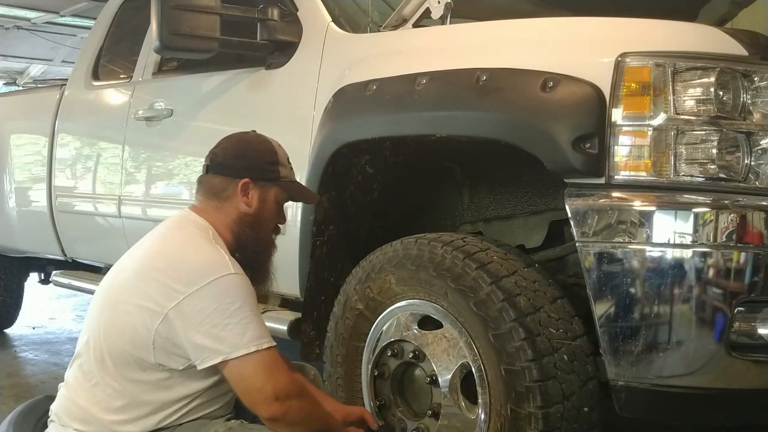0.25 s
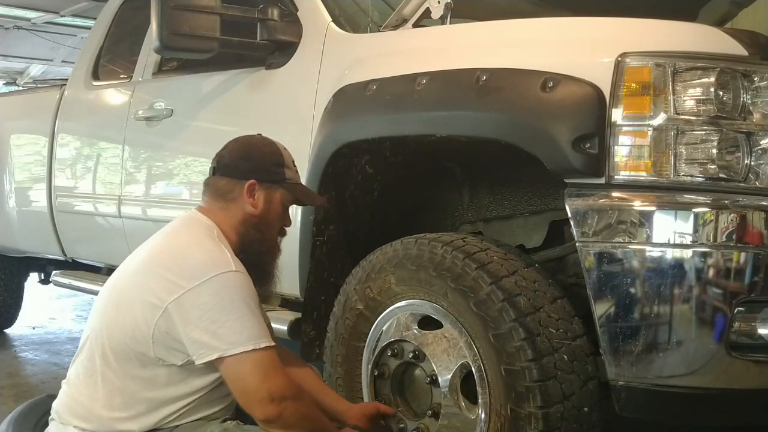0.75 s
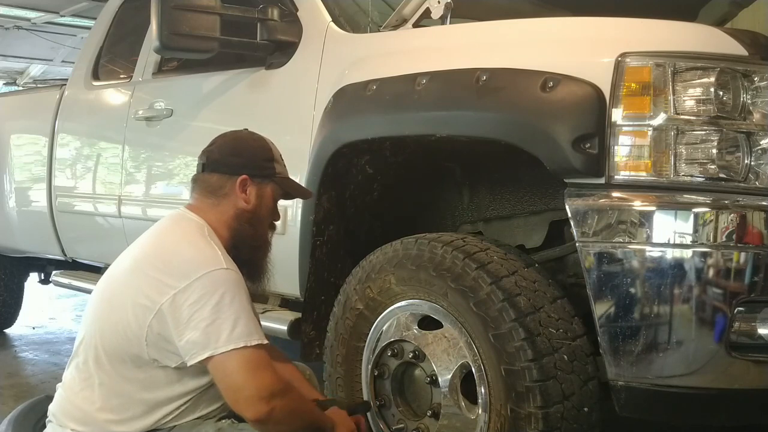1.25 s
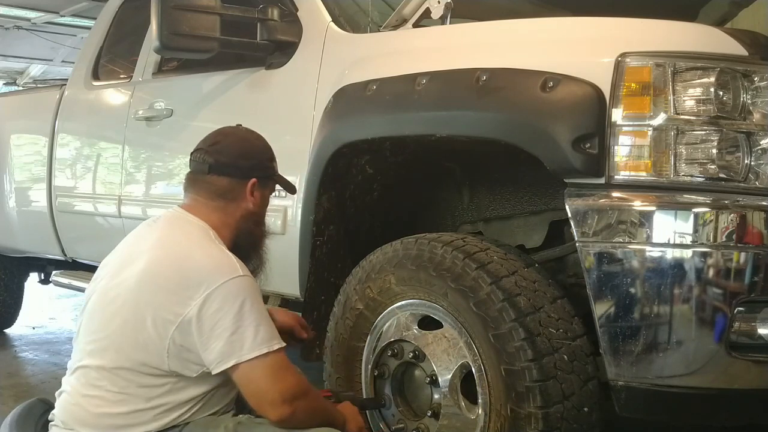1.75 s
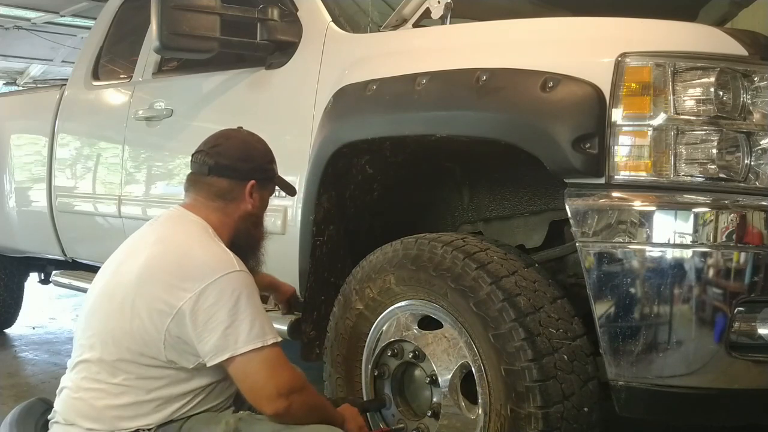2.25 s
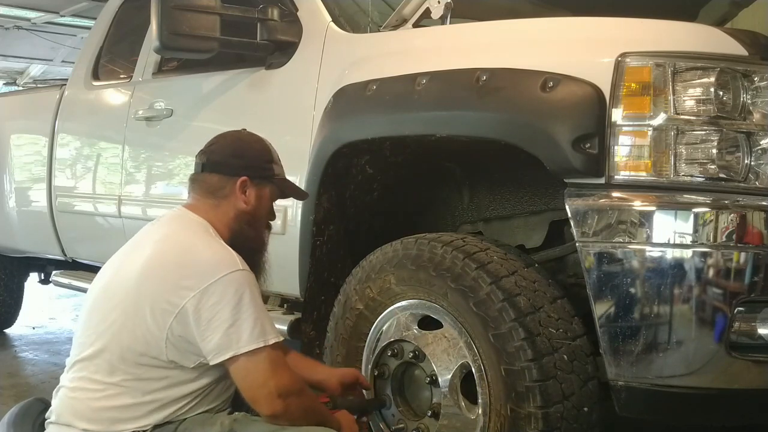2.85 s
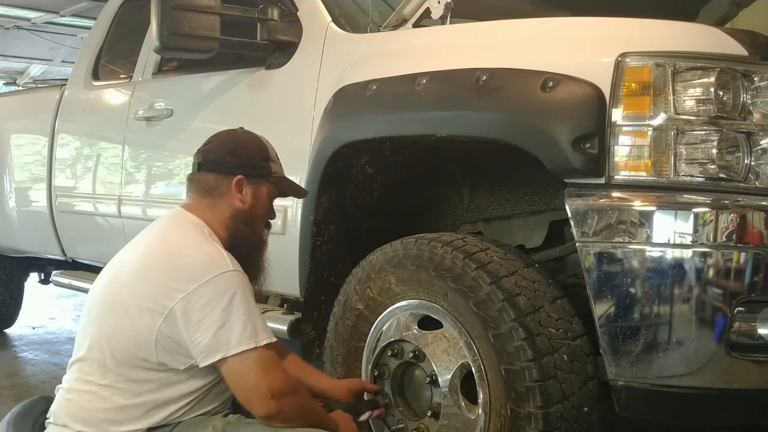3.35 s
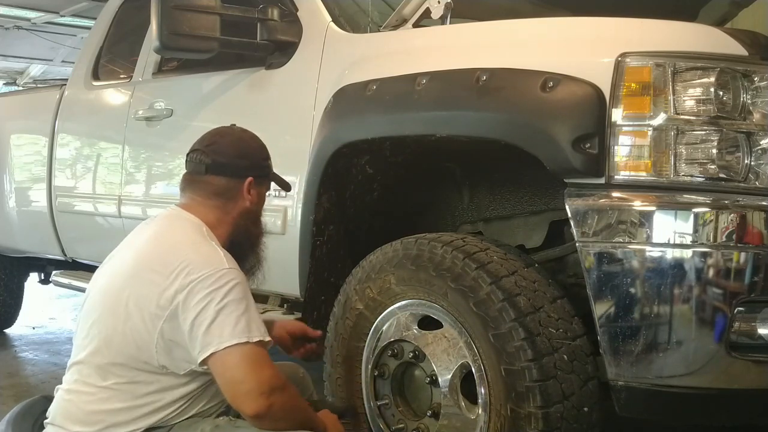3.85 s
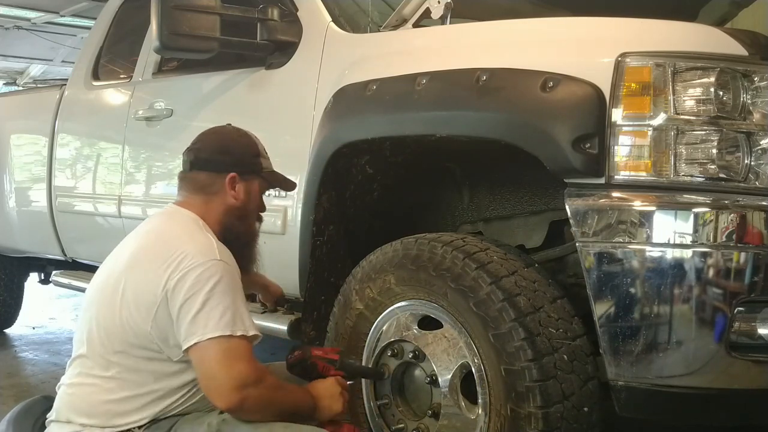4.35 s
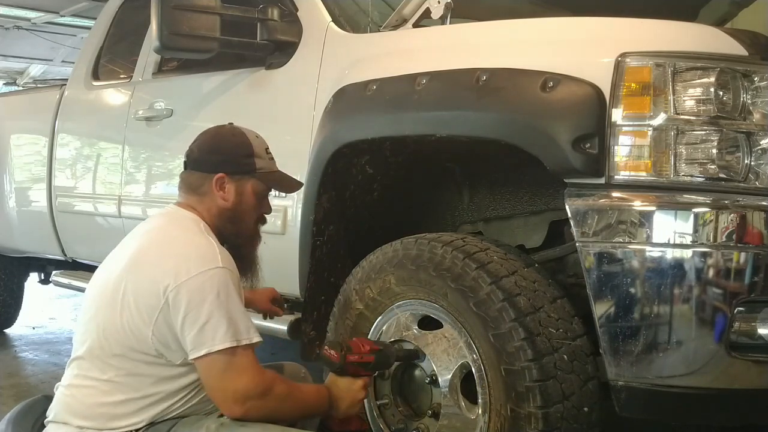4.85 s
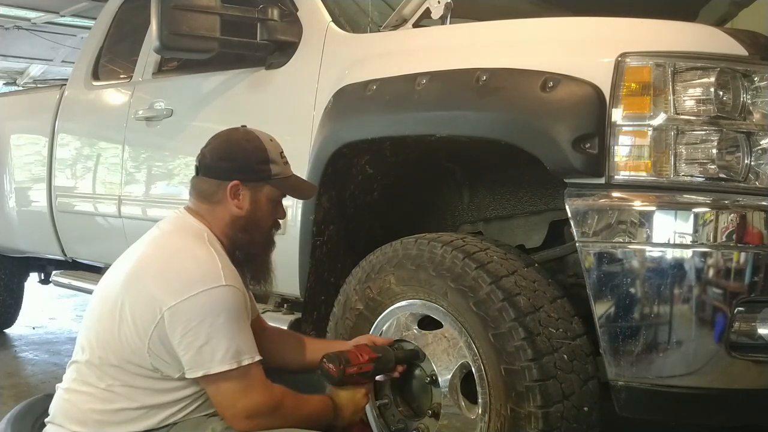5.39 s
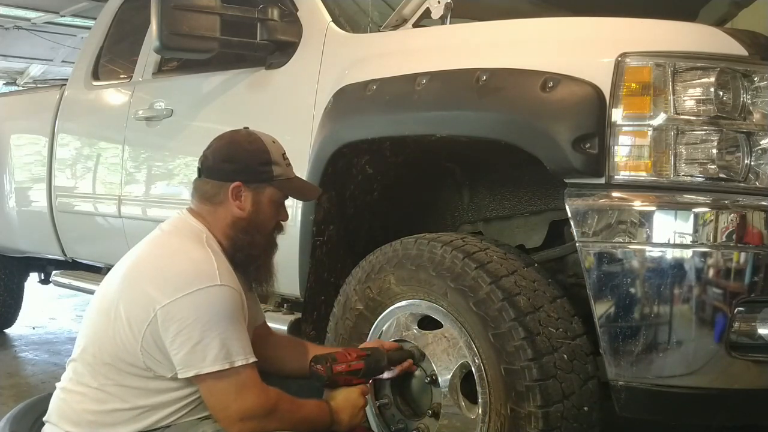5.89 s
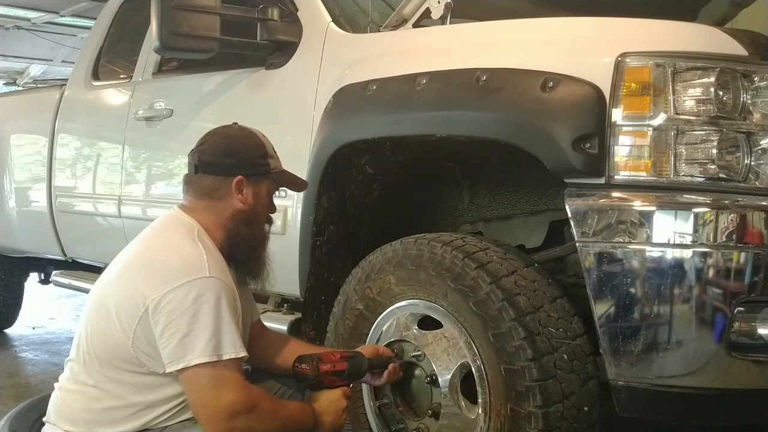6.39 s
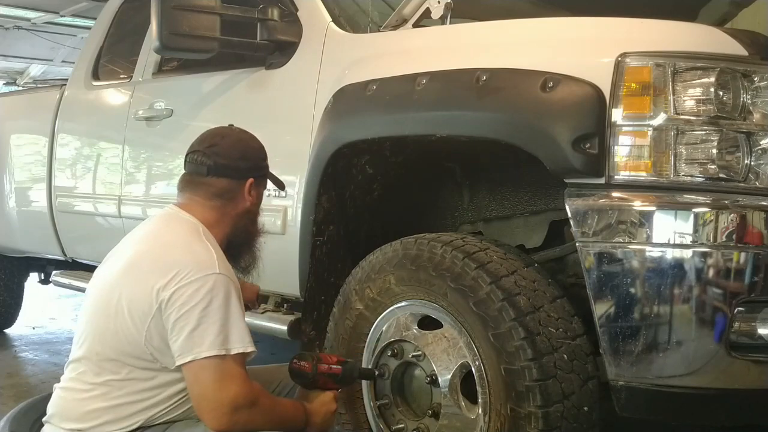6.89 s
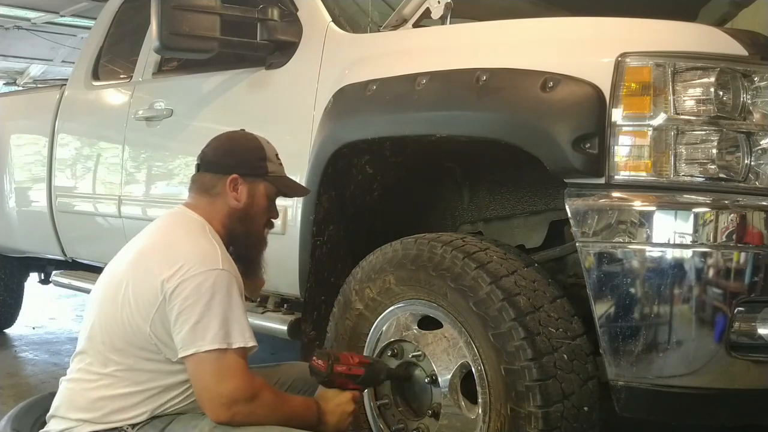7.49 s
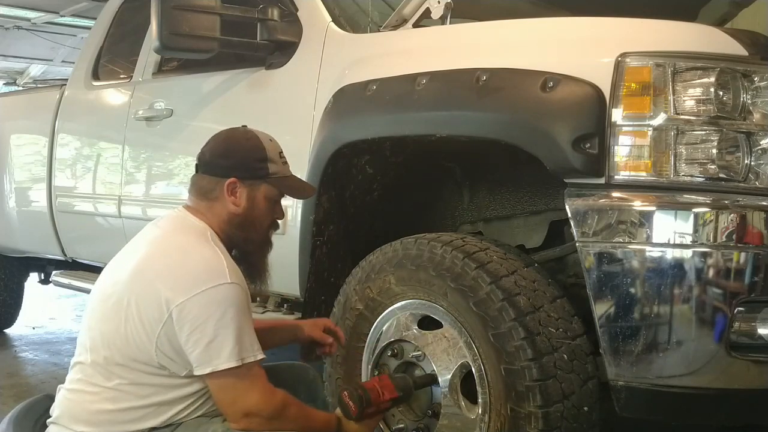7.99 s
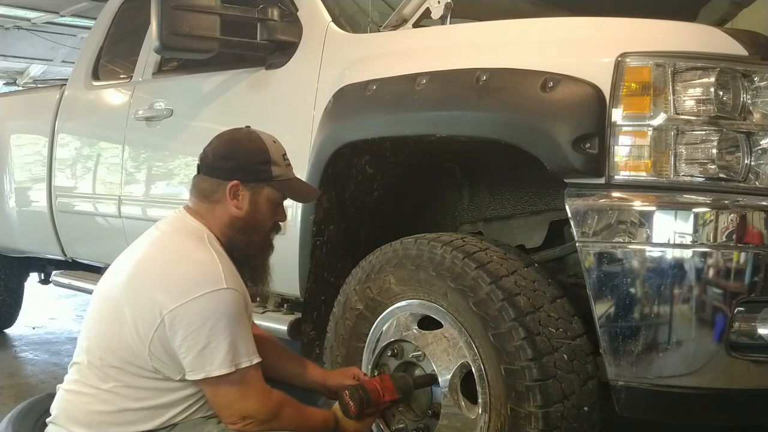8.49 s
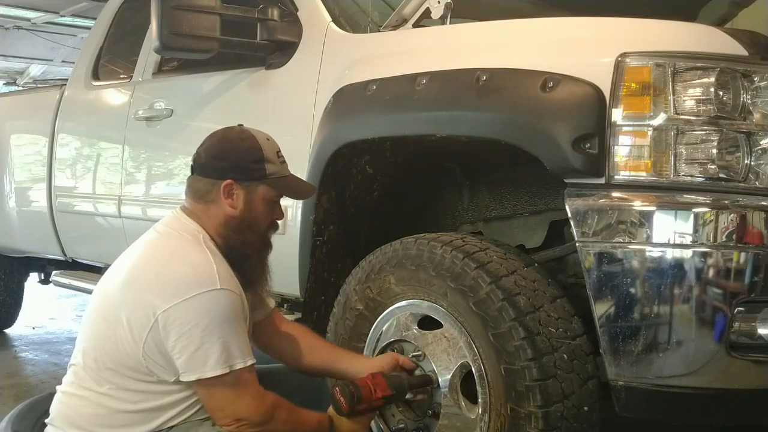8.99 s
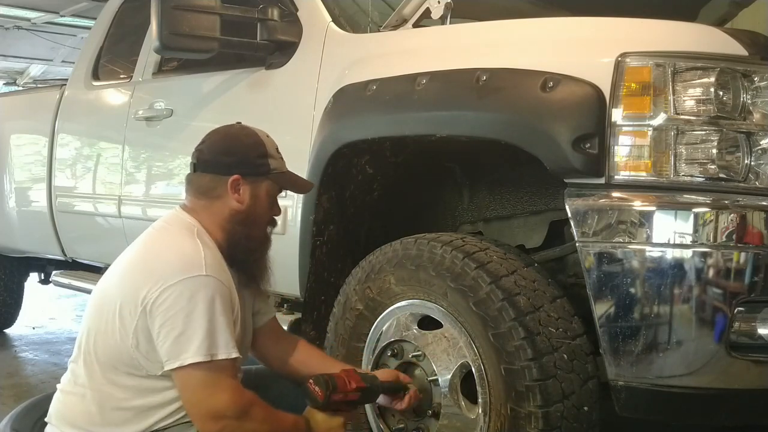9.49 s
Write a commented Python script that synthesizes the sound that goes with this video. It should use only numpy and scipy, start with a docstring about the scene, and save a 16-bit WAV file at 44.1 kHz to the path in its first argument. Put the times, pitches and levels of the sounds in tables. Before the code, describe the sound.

A cordless impact wrench whirs up, hammers briefly and squeals down three times in a hard workshop, with metal nuts clinking and clanging between pulls.

```python
"""Impact wrench on truck lug nuts

A cordless impact wrench takes lug nuts off a truck wheel in a hard-walled workshop.
Motor speed sets whine, growl and squeal; a start chirp, gear clatter and near-periodic hammer blows
of uneven strength join in. Between pulls, chattering contacts excite damped modes of nuts, socket,
wheel and running board. A fan hums below; changing reverberation and a delayed subtraction between
two close ports shape the stereo.
"""
import sys
import numpy as np
from scipy import signal
from scipy.fft import rfft, irfft, next_fast_len
from scipy.io import wavfile
from scipy.ndimage import uniform_filter1d

SR = 44100
rng = np.random.default_rng(int(sys.argv[2]) if len(sys.argv) > 2 else 0)


def master_out(mix):
    """Clip the mix to full scale and print it as 16-bit PCM to the path in sys.argv[1]."""
    frames = np.transpose(np.atleast_2d(mix))
    ceiling = np.clip(frames, -1, 1)
    pcm = np.round(ceiling * 32767).astype(np.int16)
    wavfile.write(sys.argv[1], SR, pcm)


N = 429534
T = np.arange(N) / SR

# Table levels are relative drive or mode levels, ahead of filters, mixing gains and room.
# trigger pulls: pressed t/s, let go t/s, gears catch t/s, at rest t/s, top whine f/Hz before load,
# spin-up time/s, coast time/s, running level/dB, shudder level/dB, whirr level/dB, braking squeal level/dB
PULLS = [(-.3, -.065, 0.041, 0.52, 4200, 0.047, 0.43, -23.5, -29.5, -42.5, -24.5),
         (.24, 0.441, 0.51, 0.61, 3001, .07, .3, -37, -36, -47.5, -62),
         (0.644, .875, 1.123, 1.177, 3853, .066, .6, -40.5, -34.5, -36.5, -57),
         (2.668, 3.544, 3.78, 3.91, 4552, 0.072, .33, -30, -30.5, -42, -22),
         (5.361, 6.201, 6.432, 6.56, 4567, .07, .335, -33, -31, -51.5, -17.5),
         (8.531, 9.474, 9.68, 9.9, 4574, .07, 0.37, -29.5, -27, -49, -19.5)]
# hammering: start t/s, end t/s, level/dB, time for which the freed nut still drags on its thread/s
HAMMERING = [(2.728, 3.009, -29.5, 0.15), (5.405, 5.653, -30, 0.33), (8.588, 8.895, -30, 0.21)]
# socket pushed on to the next nut: first touch t/s, seated t/s, knock level/dB, ring level/dB, hollow note f/Hz
SEATINGS = [(2.347, 2.365, -24.5, -45, 454), (4.576, 4.588, -31.5, -42.5, 604),
            (7.382, 7.402, -39.5, -42.5, 657)]
# thud spectrum of the wheel: f/Hz, spectral level/dB
WHEEL = [(30, -17), (70, -3.5), (140, -1.5), (240, -3.5), (450, -7), (900, -12.5), (2000, -20), (6000, -40)]
# high rings of a loose nut, of the socket and of a nut spinning on its stud
NUT_HZ, SOCKET_HZ, STUD_HZ = 11690, 12280, 12990
FULL_HZ = 4593  # reference whine at full speed
SEAT_CHATTER_S = 0.045
THREAD_FADE_S = 0.16  # time constant with which the gears open up again after the nut breaks free
STUD_RATTLE_S = 0.2


def undb(db):
    """Level law: decibels to amplitude gain."""
    return 10 ** (np.asarray(db) / 20)


def unit(x):
    """Power normalisation: scale to rms 1."""
    return x / np.sqrt(np.mean(x ** 2) + 1e-20)


def lookup(points, hz):
    """Interpolation of (Hz, value) points on a log-frequency axis."""
    f, value = np.transpose(points)
    return np.interp(np.log(np.maximum(hz, 1)), np.log(f), value)


def colour(x, points):
    """Minimum-phase filtering by the folded cepstrum; white input keeps its power."""
    size = 4096
    spectrum = undb(lookup(points, np.fft.rfftfreq(size, 1 / SR)))
    cepstrum = irfft(np.log(spectrum))
    cepstrum[1:size // 2] *= 2
    cepstrum[size // 2 + 1:] = 0
    impulse = irfft(np.exp(rfft(cepstrum)))
    return signal.fftconvolve(x, impulse / np.linalg.norm(impulse))[:len(x)]


def mode_pole(hz, t60):
    """Complex pole of an exponentially damped mode that falls 60 dB in t60 seconds."""
    return np.exp((2j * np.pi * hz - np.log(1000) / t60) / SR)


def ring(x, hz, t60):
    """Modal resonance: one decaying mode that carries the same energy as its drive."""
    response = signal.lfilter([1], [1, -mode_pole(hz, t60)], x + 1e-18).imag
    return unit(response) * np.sqrt(np.mean(x ** 2))


def walk(rate):
    """Band-limited random fluctuation of rms 1."""
    k = max(int(SR / rate), 2)
    knots = rng.standard_normal(N // k + 2)
    wander = np.interp(np.arange(N) / k, np.arange(N // k + 2), knots)
    return unit(uniform_filter1d(wander, k))


def cycles(hz):
    """Phase in radians as the running integral of frequency."""
    return 2 * np.pi * np.cumsum(hz) / SR


def contacts(n, rate, spread_db):
    """Random impact process: sparse contacts of uneven size, rms 1."""
    chance, size = rng.random(n), rng.standard_normal(n)
    hits = (chance < rate / SR) * rng.choice([-1, 1], n)
    return unit(hits * undb(spread_db * np.clip(size, -2, 2)))


def blow(chatter, first=0.39, rate=11000, energy_s=0.018):
    """Impact with decaying rebounds, holding the energy of energy_s seconds at rms 1."""
    t = T[:SR // 2]
    x = contacts(len(t), rate, 2.9) * np.exp(-t / max(chatter, 1e-4))
    x /= np.linalg.norm(x) + 1e-12
    x[0] += first
    return x / np.linalg.norm(x) * np.sqrt(energy_s * SR)


def add(track, s, x):
    """Superposition: mix x into track from time s."""
    i = max(int(s * SR), 0)
    track[i:i + len(x)] += x[:max(N - i, 0)]


def gate(start, end, rise, fall):
    """Envelope with a linear rise and an exponential fall."""
    return np.clip((T - start) / rise, 0, 1) * np.exp(-np.clip((T - end) / fall, 0, 50))


def radiated(x, cut_hz=560):
    """Radiation efficiency: a small body gives off little bass."""
    return signal.sosfilt(signal.butter(4, cut_hz, "high", fs=SR, output="sos"), x)


def low_pass(x, cut_hz):
    """Second-order Butterworth attenuation of the treble."""
    return signal.sosfilt(signal.butter(2, cut_hz, fs=SR, output="sos"), x)


def ports(pair):
    """Diffuse-field coherence: two unrelated signals become more alike in the bass."""
    # difference between the ports against their sum: f/Hz, level/dB
    width = [(60, -13), (130, -8.5), (260, -7), (520, -5.5), (1000, 5), (2000, 2.5), (15000, 4)]
    n = pair.shape[1]
    side = irfft(rfft(pair[1]) * undb(lookup(width, np.fft.rfftfreq(n, 1 / SR))), n)
    return np.array([pair[0] + side, pair[0] - side]) / np.sqrt(2)


def shop_fan(air_db=-70):
    """Broadband flow noise and a wavering harmonic blade hum, unequal at the two ports."""
    # moving air: f/Hz, spectral level/dB
    air_spectrum = [(25, -18), (70, 5.5), (140, 5), (300, -1), (500, 2), (900, -3.5), (1400, -9.5),
                    (2000, -12), (2800, -12.5), (4500, -22.5), (9000, -23.5), (15000, -25.5)]
    # blade hum before the port gains: f/Hz, level/dB
    blade_tones = [(70, -88.5), (140, -68.5), (210, -75.5), (280, -82), (350, -79), (490, -81.5)]
    noise = np.array([colour(rng.standard_normal(N), air_spectrum) for _ in range(2)])
    air = ports(noise) * undb(air_db + 0.49 * walk(11))
    hum = 0
    for hz, db in blade_tones:
        hum = hum + undb(db + 4.1 * walk(3.2)) * np.sin(2 * np.pi * hz * T + 0.51 * walk(28))
    return air + hum * np.array([[1.5], [.3]])


def room_response(direct_db=-8, wet_db=-0.5, build_s=0.0032):
    """Frequency-dependent exponential decay: a weak direct path, then dense reflections."""
    # workshop reverberation: f/Hz, T60/s
    decay_times = [(150, 0.78), (400, 0.37), (1000, 0.32), (2800, 0.39), (7000, 0.36), (14000, 0.3)]
    t = T[:SR * 3 // 4]
    hz = np.fft.rfftfreq(len(t), 1 / SR)
    noise, tail = rfft(ports(rng.standard_normal((2, len(t))))), 0
    for k, (_, t60) in enumerate(decay_times):
        # overlapping bands, each with its own decay
        share = lookup([(f, j == k) for j, (f, _) in enumerate(decay_times)], hz)
        tail = tail + irfft(noise * share, len(t)) * undb(-60 * t / t60)
    tail *= np.minimum(t / build_s, 1)
    response = undb(wet_db) * tail / np.linalg.norm(tail) * np.sqrt(2)
    response[:, 0] += undb(direct_db)
    return response


def workshop(x, count=5):
    """Time-varying convolution: tool and worker move, so one reflection pattern fades into the next."""
    place = T / .3  # one pattern every 0.3 s, in rotation
    out = 0
    for k in range(count):
        distance = np.abs((place - k + 1) % count - 1)
        weight = np.cos(np.pi / 2 * np.minimum(distance, 1))
        out = out + signal.oaconvolve((x * weight)[None], room_response(), axes=1)[:, :N]
    return out


def low_tones(t60=0.21):
    """Noise-driven resonance: faint, rough low tones come and go."""
    # swells: start t/s, end t/s, f/Hz, level/dB
    swells = [(0.17, 0.545, 291, -58.5), (1.68, 1.746, 163, -53), (6.698, 6.846, 289, -61.5),
              (7.041, 7.076, 492, -58), (7.195, 7.443, 292, -60), (7.943, 8.08, 292, -46)]
    out = 0
    for start, end, hz, db in swells:
        out = out + undb(db) * gate(start, end, 0.022, 0.015) * ring(rng.standard_normal(N), hz, t60)
    return out


def thumps():
    """Low-frequency impact response: short, dry and dull, stronger at the left port."""
    # thumps before the port gains: t/s, level/dB
    thump_events = [(0.955, -43), (3.8, -48.5)]
    x = np.zeros(N)
    for s, db in thump_events:
        add(x, s, undb(db) * blow(0.0023))
    return colour(x, WHEEL) * np.array([[1], [.3]])


def running_board():
    """Modal excitation by soft contact: a nut put down booms the step, a duller contact its lowest modes."""
    # nuts put down: t/s, chatter time/s, level/dB, dull above f/Hz
    set_downs = [(0, 0.03, -50.5, 610), (2.14, 0.047, -41.5, 600), (2.351, 0.036, -45.5, 500),
                 (5.085, 0.017, -44, 600), (5.14, 0.03, -47, 260), (8.055, 0.021, -51.5, 350),
                 (8.11, 0.023, -46, 600), (8.185, 0.037, -46, 150)]
    # running board modes: f/Hz, T60/s, relative level/dB
    board_modes = [(108, .12, -7), (144, 0.18, 3), (163.7, 0.097, 0.5), (201.4, 0.14, 3.5), (242, .1, -1.5),
                   (279.4, 0.22, 3), (320, 0.13, -6.5)]
    force = np.zeros(N)
    for s, chatter, db, dull_hz in set_downs:
        add(force, s, undb(db) * low_pass(blow(chatter, first=0.29), dull_hz))
    out = 0
    for hz, t60, db in board_modes:
        pole = mode_pole(hz, t60)
        gain = undb(db + 3) * np.sqrt(2 * (1 - abs(pole) ** 2))
        out = out + gain * signal.lfilter([1], [1, -pole], force + 1e-18).imag
    return out


def clangs(detune=.007, scatter_db=1.2):
    """Modal participation: each contact strikes another spot, altering the steel step's bright modes."""
    # nuts clang on the step: t/s, chatter time/s, level/dB
    strikes = [(1.831, .007, -40.5), (2.14, 0.033, -33.5), (4.965, 0.02, -45), (5.07, 0.023, -43.5),
               (7.962, 0.0058, -54), (7.999, 0.03, -53)]
    # bright modes in close clusters: f/Hz before detuning, T60/s, relative level/dB before scatter
    bright_modes = [(726, 0.1, -15), (846, .03, -9.5), (1035, 0.04, -12), (1190, 0.048, -4),
                    (1356, 0.05, -14.5), (1700, .04, -3.5), (2090, 0.1, -10.5), (2570, 0.044, -4),
                    (2637, .07, -7.5), (3060, .04, -14), (3346, .035, -7), (3666, .04, -6.5),
                    (5030, .035, -8), (5460, 0.021, -10)]
    out = np.zeros(N)
    for s, chatter, db in strikes:
        x = undb(db) * blow(chatter, first=0.13)
        variations = rng.standard_normal((len(bright_modes), 2))
        for (hz, t60, mode_db), (shift, size) in zip(bright_modes, variations):
            note = ring(x, hz * (1 + detune * shift), t60)
            add(out, s, undb(mode_db + scatter_db * size) * note)
    return out


def hollow_notes(t60=0.02, seat_note_db=-2):
    """Heavy damping: struck wheel, nut or step answers each contact with a short hollow note."""
    # short hollow notes of struck wheel, nut or step: t/s, chatter time/s, f/Hz, level/dB
    struck_notes = [(2.098, 0.026, 2800, -54), (2.096, 0.026, 3580, -54.5), (4.556, 0.035, 390, -46),
                    (4.59, 0.03, 860, -38), (4.59, 0.027, 1310, -37.5), (4.963, 0.018, 446, -51),
                    (5.072, 0.025, 3320, -39), (7.386, 0.038, 679.7, -39), (7.39, 0.032, 500, -44),
                    (7.392, 0.022, 317, -32), (7.919, .023, 1694, -42), (7.934, 0.016, 2680, -33.5),
                    (7.935, .06, 690, -51.5), (7.937, 0.0065, 1750, -38), (7.962, 0.0043, 1270, -43),
                    (7.993, 0.032, 2810, -38), (7.996, .015, 1180, -56), (8.103, .002, 1115, -41.5),
                    (8.103, 0.0022, 1510, -47), (8.11, .023, 498, -41.5)]
    seat_notes = [(seated, SEAT_CHATTER_S, hz, db + seat_note_db) for _, seated, db, _, hz in SEATINGS]
    out = np.zeros(N)
    for s, chatter, hz, db in struck_notes + seat_notes:
        note = ring(blow(chatter), hz, t60)
        add(out, s, undb(db) * radiated(note, .7 * hz))
    return out


def steel_ring(x):
    """Modal superposition: socket and rim ring on after a blow."""
    # socket and rim modes: f/Hz, T60/s, relative level/dB
    steel_modes = [(680, 0.38, -10.5), (1175, 0.14, -4.5), (1720, 0.15, -9), (2660, 0.021, 3),
                   (3320, 0.16, -8.5), (4700, .12, -16)]
    return sum(undb(db) * ring(x, hz, t60) for hz, t60, db in steel_modes)


def seating_taps(touch_db=-7.5, click_db=-7, tick_db=-12):
    """Successive impacts: the socket touches the nut lightly, then slides home with a chattering knock."""
    taps = []
    for touch, seated, db, ring_db, _ in SEATINGS:
        for s, force_db in [(touch, touch_db), (seated, 0)]:
            knock_db = db + force_db
            taps.append((s, SEAT_CHATTER_S, knock_db + click_db, knock_db, ring_db + tick_db,
                         SOCKET_HZ, ring_db))
    return taps


def nut_load(fade_s):
    """Load envelope: 1 while a tight nut holds the socket, fading once it breaks free."""
    return sum(gate(start - .06, end, 0.0043, fade_s) for start, end, *_ in HAMMERING)


def rattles(socket_db=-45.5, stud_db=-38.5):
    """Random contact drives of nut on stud, unloaded socket and nut in socket: (drive, Hz)."""
    # a freed nut rattles in the socket: start t/s, end t/s, ring f/Hz, level/dB
    rattle_events = [(.045, 0.236, SOCKET_HZ, -44.5), (0.362, 0.477, SOCKET_HZ, -51),
                     (0.984, 1.06, NUT_HZ, -46), (3.801, 3.909, NUT_HZ, -43.5), (6.336, 6.592, NUT_HZ, -43),
                     (9.601, 9.702, NUT_HZ, -52)]
    stud = sum(gate(end, end + STUD_RATTLE_S, .005, .01) for _, end, *_ in HAMMERING)
    spinning = sum(gate(pressed + 0.054, catch - .03, .005, .01) for pressed, _, catch, *_ in PULLS)
    socket = spinning * (nut_load(STUD_RATTLE_S) < .4)
    parts = [(undb(stud_db) * stud, STUD_HZ), (undb(socket_db) * socket, SOCKET_HZ)]
    for start, end, hz, db in rattle_events:
        parts.append((undb(db) * gate(start, end, 0.001995, 0.0076), hz))
    return [(gain * contacts(N, 700, 2.3), hz) for gain, hz in parts]


def nuts(ring_t60=0.084, rattle_t60=.06, tail_t60=0.56, tail_db=-9.5):
    """Steel impact: click, bright tick, dull knock of wheel or tool body, and a high modal ring."""
    # nuts and socket clink: t/s, chatter time/s, click level/dB, knock level/dB, bright tick level/dB,
    # ring f/Hz, ring level/dB
    tap_events = [(.008, 0.022, -32, -48, -51, SOCKET_HZ, -47),
                  (0.3, 0.0027, -33.5, -45, -30.5, SOCKET_HZ, -41),
                  (0.681, 0.0031, -42, -66.5, -35, SOCKET_HZ, -39.5),
                  (1.077, 0.0027, -40, -53, -40, SOCKET_HZ, -47),
                  (1.649, 0.003, -62.5, -75, -58, NUT_HZ, -65), (1.831, 0.0069, -43, -56, -48, NUT_HZ, -54),
                  (2.139, 0.018, -26.5, -33.5, -32, SOCKET_HZ, -61),
                  (3.797, 0.0013, -41, -57, -36.5, NUT_HZ, -49),
                  (4.355, .006, -68.5, -79, -83, NUT_HZ, -84), (4.962, 0.032, -30, -37.5, -44, NUT_HZ, -37),
                  (5.029, 0.027, -32.5, -73.5, -48, NUT_HZ, -35),
                  (5.068, 0.018, -31.5, -41, -51, NUT_HZ, -59.5),
                  (6.438, .0029, -54, -67, -43, NUT_HZ, -41), (6.753, 0.0033, -81, -77.5, -67, NUT_HZ, -63),
                  (6.823, .003, -68.5, -79, -77, NUT_HZ, -76),
                  (7.108, 0.014, -78, -80, -54, SOCKET_HZ, -40),
                  (7.917, 0.022, -52.5, -64, -67, NUT_HZ, -72),
                  (7.964, 0.005, -36.5, -73, -40, NUT_HZ, -46),
                  (7.998, 0.007, -33.5, -73, -48, NUT_HZ, -56),
                  (8.103, 0.002, -40, -34.5, -63, NUT_HZ, -81)]
    # spectra of click, knock and tick: f/Hz, spectral level/dB
    click_spectrum = [(100, -22), (500, -19.5), (1200, -2.5), (2000, 6), (2750, 2.5), (3400, -1),
                      (4300, 3.5), (5200, -4.5), (7000, -3.5), (10000, -14), (13000, -21), (15500, -24.5)]
    knock_spectrum = [(25, -43), (90, -21.5), (160, 0), (300, -0.5), (480, -4.5), (800, 4.5), (1250, 1.5),
                      (2000, -1), (4000, -11.5), (12000, -43)]
    tick_spectrum = [(500, -39.5), (3000, -19.5), (5500, -0.5), (9500, -1), (14000, -9), (15500, -9.5)]
    click, knock, tick, rings = np.zeros((4, N))
    for s, chatter, click_db, knock_db, tick_db, hz, ring_db in tap_events + seating_taps():
        x = blow(chatter, first=0.17)
        add(click, s, undb(click_db) * x)
        add(knock, s, undb(knock_db) * x)
        add(tick, s, undb(tick_db) * x)
        add(rings, s, undb(ring_db) * ring(x, hz, ring_t60))
    for x, hz in rattles():
        rings += ring(x, hz, rattle_t60)
        if hz == NUT_HZ:  # a loose nut rings on after its rattle
            rings += undb(tail_db) * ring(x, hz, tail_t60)
        tick += undb(-9.5) * x
    # touching the socket keeps disturbing the ring
    rings *= .85 + .35 * walk(140) + .05 * walk(900)
    clicks = colour(click, click_spectrum) + undb(-13) * steel_ring(click)
    return clicks + colour(knock, knock_spectrum) + colour(tick, tick_spectrum) + rings


def chirps(switch_hz=10000, spread_hz_per_s=9000, body_hz=2720, chirp_db=-37.5):
    """Switching sidebands part as the rotor gathers speed; a noisy body resonance sounds with them."""
    out, load = np.zeros((2, N))
    for s, _, _, _, top_hz, *_ in PULLS:
        gain = undb(chirp_db) * top_hz / FULL_HZ  # gentler pulls chirp less
        offset = spread_hz_per_s * np.clip(T - s - .01, 0, .1)
        tones = np.sin(cycles(switch_hz + offset)) + 0.65 * np.sin(cycles(switch_hz - offset))
        out += gain * gate(s - .003, s + 0.04, 0.042, .008) * tones
        load += gain * gate(s + 0.0056, s + .06, 0.046, 0.016)
    body = undb(5.0) * load * ring(rng.standard_normal(N), body_hz, 0.026)
    return out * (1 + 0.28 * walk(400)) + body


def hammer(scatter_db=3.0, thud_db=-7, bite_s=0.014, blows_per_s=42.1):
    """Near-periodic impact and rebound of two dogs on the anvil; as the socket bites, the wheel thuds: (steel, thud)."""
    # anvil: f/Hz, spectral level/dB
    anvil_spectrum = [(100, -15), (400, -5.5), (900, -5.5), (1600, -4.5), (2100, -1), (2700, -0.5),
                      (3300, -0.5), (5000, -2.5), (8000, -4), (11000, -5), (13000, -8), (15500, -11.5)]
    steel, thud = np.zeros(N), np.zeros(N)
    for start, end, db, _ in HAMMERING:
        times = np.arange(start, end, 1 / blows_per_s)
        for s, (late, size, rebound, grip) in zip(times, rng.standard_normal((len(times), 4))):
            s += .0007 * late
            add(steel, s, undb(db - 3.5 + .8 * scatter_db * size) * blow(.003, first=.3))
            add(steel, s + .011 + .0015 * rebound, undb(db - 7) * blow(0.012, first=0.18))
            bite = np.clip((s - start) / bite_s, .1, 1)
            add(thud, s, bite * undb(db + thud_db + scatter_db * grip) * blow(0.0038, first=0.94))
    return colour(steel, anvil_spectrum) + undb(-16.5) * steel_ring(steel), colour(thud, WHEEL)


def drive():
    """Rotor inertia and load: speed in Hz of the whine, then gains of running, shudder and final whirr."""
    # the gear noise drops out briefly: t/s, half length/s, depth/dB
    lulls = [(0.969, 0.054, 19.5), (9.592, 0.022, 19)]
    ease_s, ease_lead_s = .015, .009  # the finger eases off the trigger just before it lets go
    kick_db, kick_s = 4, 0.14  # the starting torque shakes the gears harder
    shudder_hz, shudder_width_hz = 3134, 730  # whine at which the slack gears shudder most
    load_sag, recover_s = .33, .066  # share of speed lost to a tight nut, recovery time constant
    thread_damp_db, thread_step_db = 13.5, 6.5  # gear damping by the tight nut, and by its thread
    hz, run, shudder, whirr = np.zeros((4, N))
    for pressed, let_go, catch, rest, top_hz, spin_s, coast_s, run_db, shudder_db, whirr_db, _ in PULLS:
        coasted_s = ease_s * np.logaddexp(0, (T - let_go + ease_lead_s) / ease_s)
        spin_up = 1 - np.exp(-(np.maximum(T - pressed, 0) / spin_s) ** 1.5)
        speed = spin_up * np.exp(-coasted_s / coast_s)
        hz = np.where(T >= pressed, top_hz * speed, hz)
        run += undb(run_db) * speed ** 2 * gate(pressed, let_go - .04, .005, 0.16)
        kick = kick_db * gate(pressed, pressed + kick_s, .005, .02)
        shudder += undb(shudder_db + kick) * gate(pressed, catch, .005, .007)
        whirr += undb(whirr_db) * gate(catch, rest, 0.1, 0.015)
    hz *= 1 - load_sag * nut_load(recover_s)
    shudder *= np.exp(-.5 * ((hz - shudder_hz) / shudder_width_hz) ** 2)
    lull_db = sum(db * np.exp(-((T - s) / half) ** 2) for s, half, db in lulls)
    on_thread = sum(gate(start - .06, end + drag_s, .005, 0.0076) for start, end, _, drag_s in HAMMERING)
    freedom = undb(-thread_damp_db * nut_load(THREAD_FADE_S) - thread_step_db * on_thread - lull_db)
    return hz, run * freedom, shudder * freedom, whirr


def clear_whine(octave_db=-8):
    """Direct path: near full speed the whine reaches the ports, the left one slightly later."""
    # share of whine heard straight from the tool, interpolated in time: t/s, level/dB
    direct_share = [(.4, -18), (.95, -10.5), (2.7, -21), (6.4, -19), (8.6, -1.5)]
    hz, run, _, _ = drive()
    phase = cycles(hz) + .25 * walk(300)
    run = run * undb(-20 * nut_load(THREAD_FADE_S) + 1.5 * walk(70)) * np.minimum(hz / FULL_HZ, 1) ** 8
    tones = np.sin(phase) + undb(octave_db) * np.sin(2 * phase)
    x = run * undb(np.interp(T, *np.transpose(direct_share))) * tones
    return np.array([np.roll(x, 3), x])  # 3 samples


def motor(growl_ratio=.303, mesh_ratio=.605, idle_mesh_db=-17, slack_hz=1200, run_growl_db=-6.5,
          growl_db=-6, rasp_db=-5, case_db=-2.5):
    """Speed-locked harmonics: whine, gear growl and squeal follow the rotor; teeth clatter in the housing."""
    # housing: f/Hz, spectral level/dB
    housing_spectrum = [(60, -14), (200, -5), (450, -10.5), (700, -2.5), (1000, 1), (1900, 2.5), (2650, 8),
                        (3300, -2.5), (4300, -1), (6000, -7), (9000, -7.5), (12000, -11), (15500, -27)]
    # drive clatter against running, against shudder; then its level when idling and when hammering
    clatter_run_db, clatter_shudder_db, clatter_idle_db, clatter_hammer_db = -4, -1.5, -43.5, -34.5
    slip_db, shake_rad = 3.5, .85  # slack gears grip and slip: flicker, phase shake
    hz, run, shudder, whirr = drive()
    gears = np.hypot(run, shudder)
    turning = sum(gate(pressed + 0.017, catch, 0.0073, .01) for pressed, _, catch, *_ in PULLS)
    phase = cycles(hz * (1 + 0.00297 * walk(250)))
    whine = undb(-31.0) * np.sin(phase) + undb(-34.5) * np.sin(2 * phase) + undb(-41.5) * np.sin(3 * phase)
    whine *= np.minimum(hz / FULL_HZ, 1) ** 7 * gears / undb(-28.0)
    # backlash smears the slow gear stage into a rough band
    band = walk(330) * np.sin(growl_ratio * phase) + walk(750) * np.cos(growl_ratio * phase)
    growl = unit(band) * np.hypot(run * undb(run_growl_db), shudder * undb(growl_db))
    teeth = contacts(N, 12000, 1.9) * (1 + 0.2 * np.sin(phase / 36)) * undb(1.9 * walk(60))
    hammering = sum(gate(start - .02, end, 0.008, 0.061) for start, end, *_ in HAMMERING)
    causes = [undb(clatter_run_db) * run, undb(clatter_shudder_db) * shudder,
              undb(clatter_idle_db) * turning, whirr, undb(clatter_hammer_db) * hammering]
    clatter = colour(teeth, housing_spectrum) * np.linalg.norm(causes, axis=0)
    # braking throws the load on to the other flank of the teeth
    braking = sum(undb(db) * gate(let_go, let_go + 0.06, 0.0023, 0.016) for _, let_go, *_, db in PULLS)
    tooth = mesh_ratio * phase + 0.25 * walk(300)
    mesh = np.sin(tooth) + undb(-26) * np.sin(2 * tooth) + undb(-29) * np.sin(3 * tooth)
    mesh *= braking + gears * undb(idle_mesh_db)
    # below full speed the slack gears rasp at the pitch of the whine
    slack = gears * np.clip((FULL_HZ - hz) / slack_hz, 0, 1) ** 1.9
    shake = shake_rad * walk(450)
    grip = unit(undb(slip_db * walk(110)))
    # the second mesh harmonic sings as it falls through the resonance of the gear case
    in_case = np.exp(-((2 * mesh_ratio * hz - 2750) / 400) ** 2)
    rasp = np.sin(phase + shake) * undb(rasp_db) + np.sin(2 * tooth + shake) * in_case * undb(-3.5)
    rasp *= slack * grip
    # the slack teeth also hammer on the gear case
    gear_case = ring(contacts(N, 1500, 3), 2550, .008) * slack * undb(case_db)
    # the rotor hums faintly, once a turn
    turn = phase / 13
    rotor = np.sin(turn + .5 * walk(40)) * run * undb(-21.0)
    return whine + rotor + radiated(growl + rasp) + clatter + mesh + gear_case


def scene(room_db=-3.0, direct_db=-9, near_thud_db=-4):
    """Superposition of reverberant sources, direct motor, antiphase wheel thud, whine, thumps and fan."""
    gears = motor()
    anvil, thud = hammer()
    sources = undb(room_db) * gears + chirps() + anvil + thud + nuts() + hollow_notes()
    sources += running_board() + clangs() + low_tones()
    near_thud = undb(near_thud_db) * low_pass(thud, 500) * np.array([[1], [-1]])
    direct = undb(direct_db) * gears + near_thud + clear_whine() + thumps()
    return workshop(sources) + direct + shop_fan()


def record(dry):
    """Delay-and-subtract directivity: the delayed other port is subtracted to widen; the top is cut."""
    # share of the other port that is subtracted: f/Hz, level/dB
    cross_share = [(100, -.6), (300, -.8), (1000, -1.3), (6700, -1.5), (8500, -7), (15000, -6)]
    # left minus right: f/Hz, level/dB
    balance = [(250, -0.5), (1000, 0.2), (2500, -2.5), (5000, 3), (9500, 1.2), (12300, -6.5), (15000, 0)]
    port_lag_s, top_hz = 20 / SR, 15400
    size = next_fast_len(N + SR)
    hz, pair = np.fft.rfftfreq(size, 1 / SR), rfft(dry, size)
    cross = undb(np.minimum(lookup(cross_share, hz), 0))
    delayed_other = np.exp(-2j * np.pi * hz * port_lag_s) * pair[::-1]
    wide = (pair - cross * delayed_other) / np.hypot(1, cross)
    wide *= undb(np.array([[1], [-1]]) * lookup(balance, hz) / 2)
    top_cut = signal.ellip(10, .2, 80, top_hz, fs=SR, output="sos")
    return signal.sosfilt(top_cut, irfft(wide, size)[:, :N])


dry = scene()
out = record(dry)
master_out(out)
```